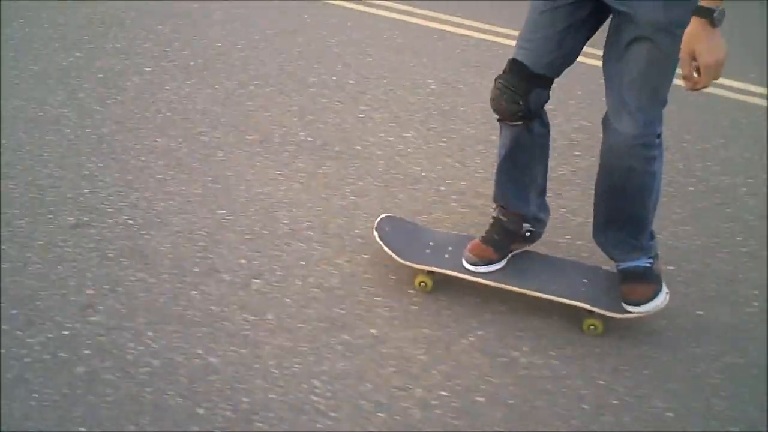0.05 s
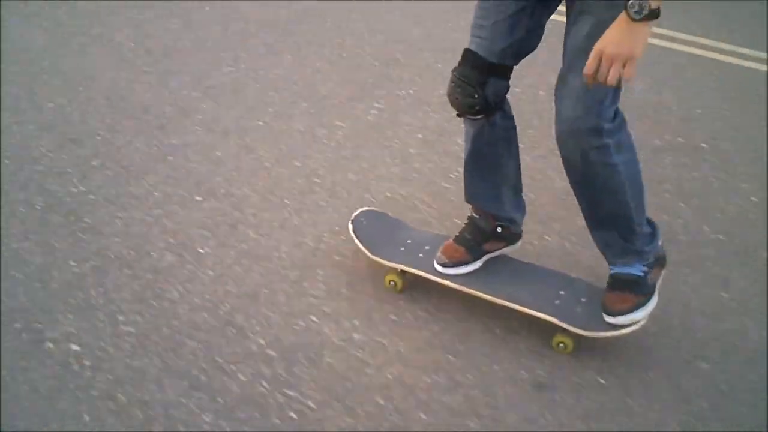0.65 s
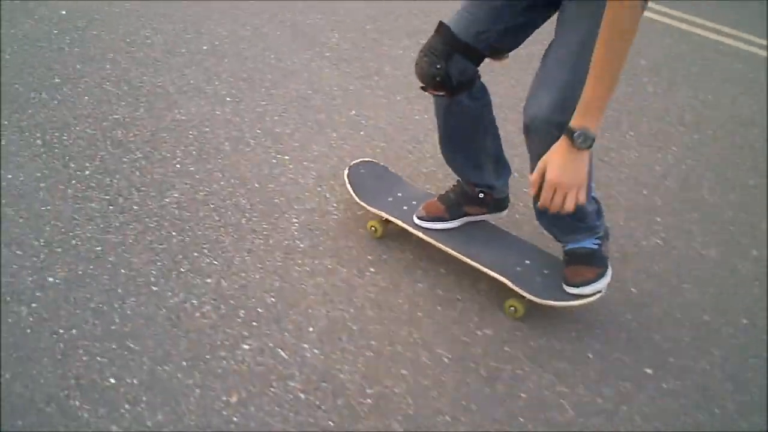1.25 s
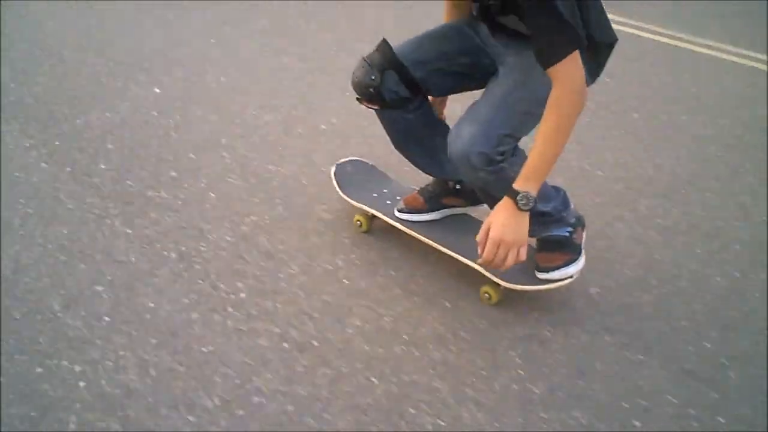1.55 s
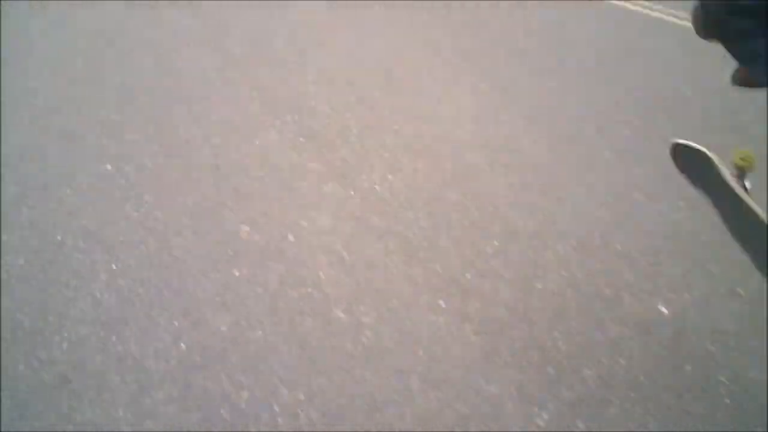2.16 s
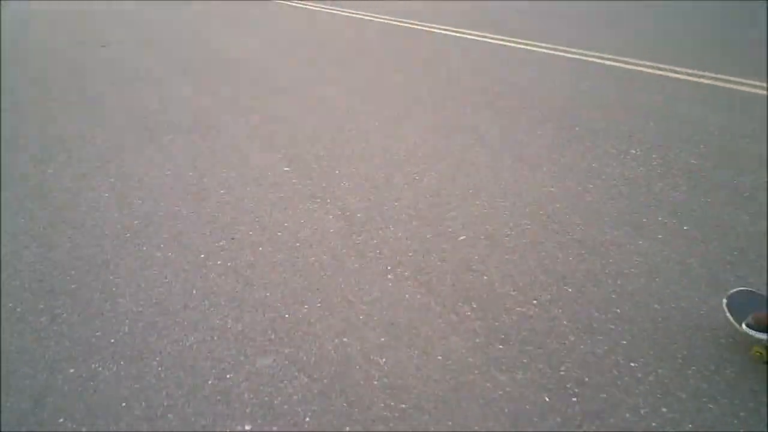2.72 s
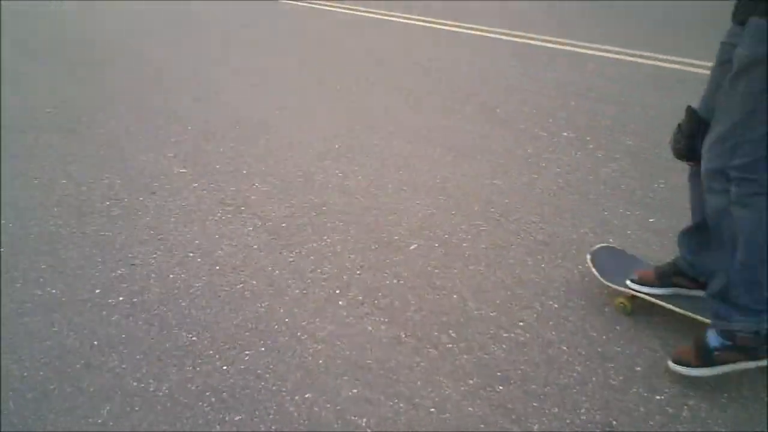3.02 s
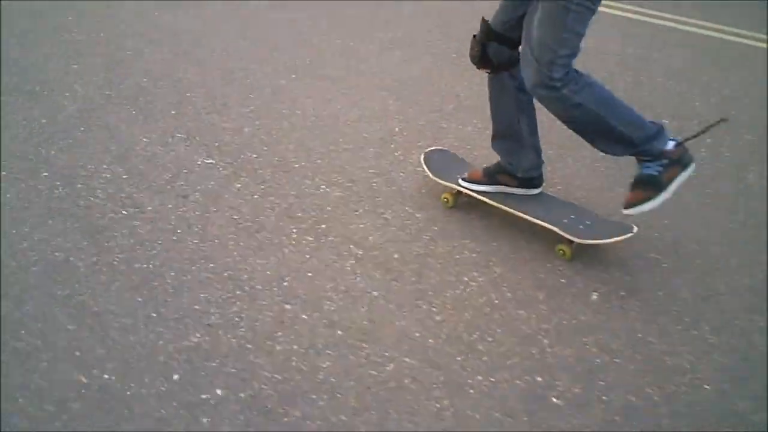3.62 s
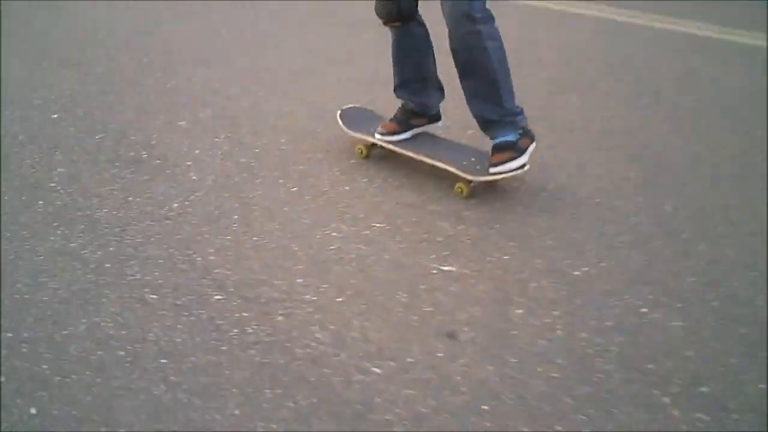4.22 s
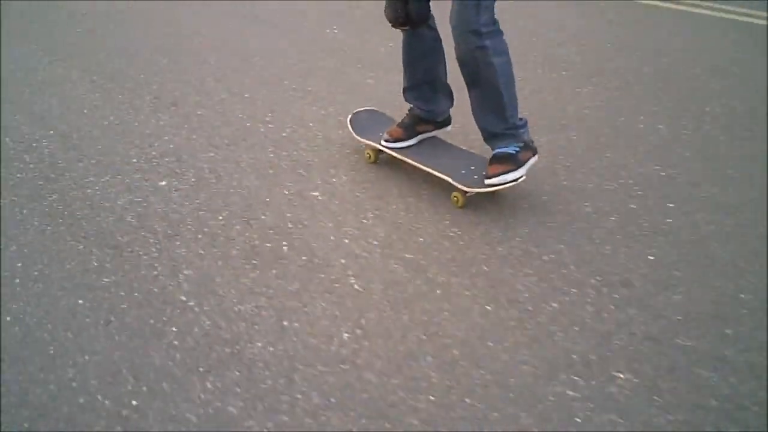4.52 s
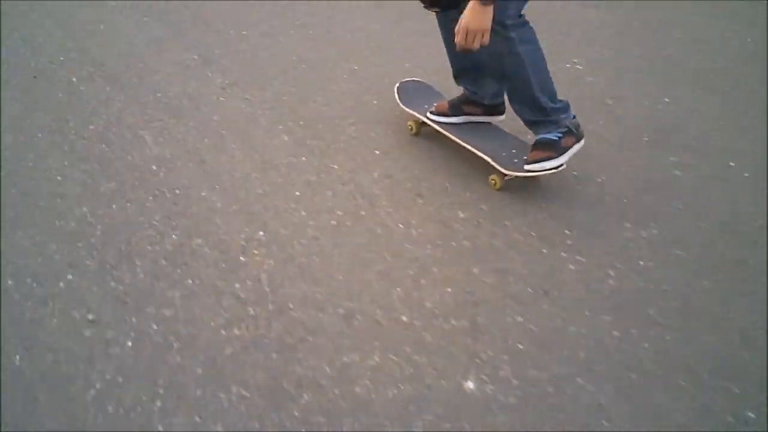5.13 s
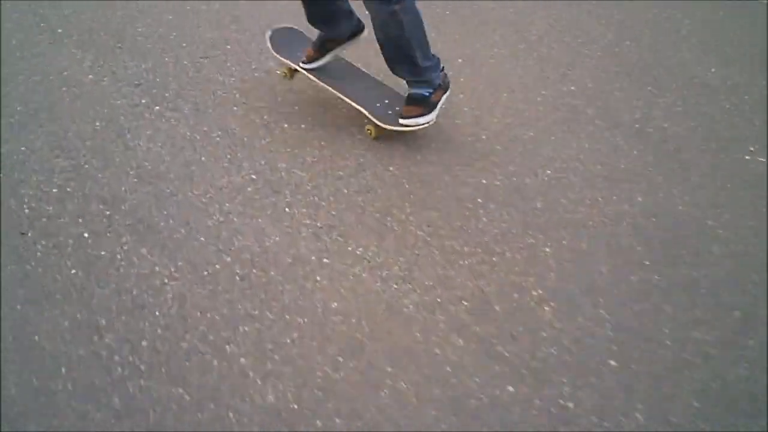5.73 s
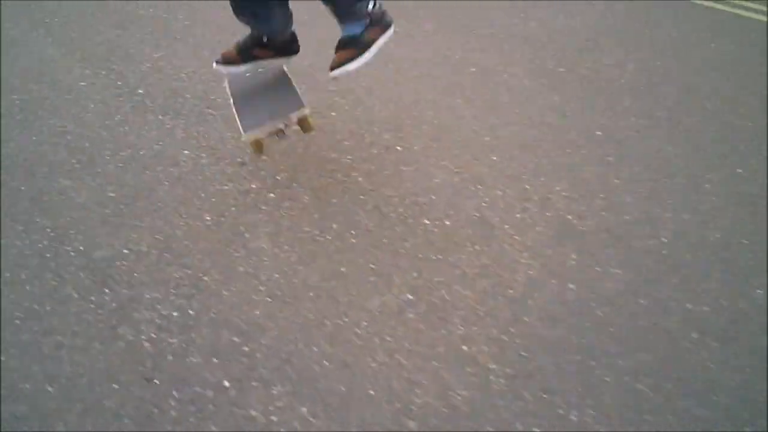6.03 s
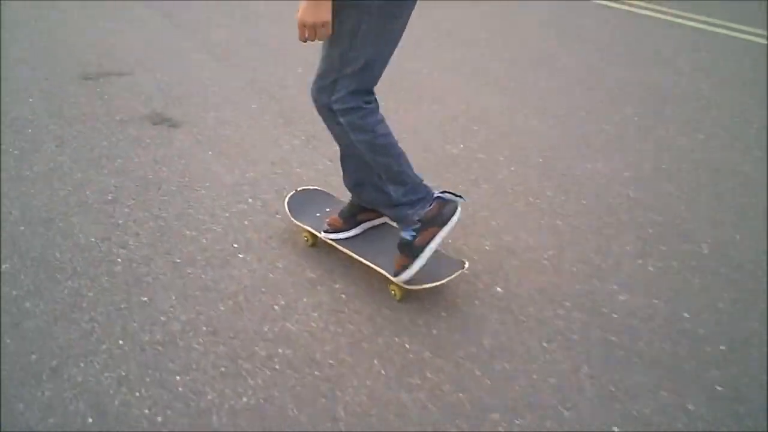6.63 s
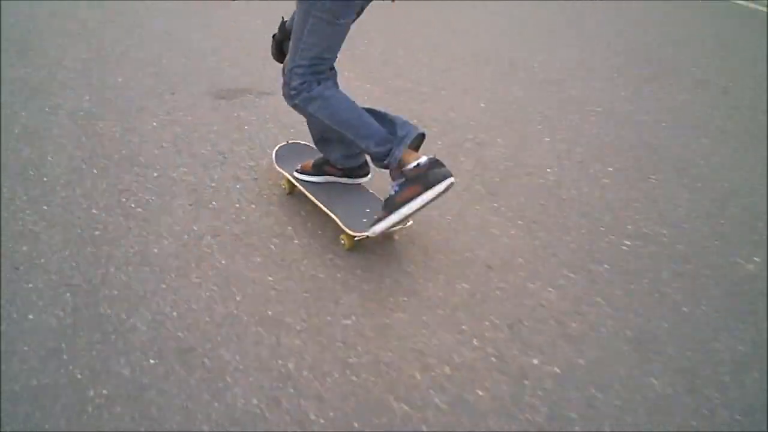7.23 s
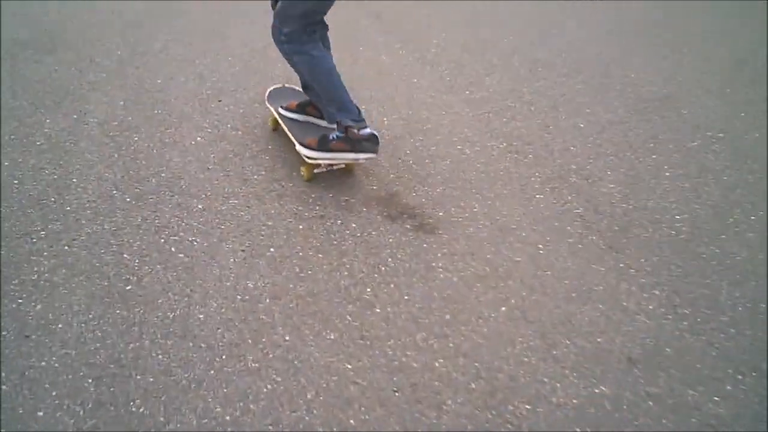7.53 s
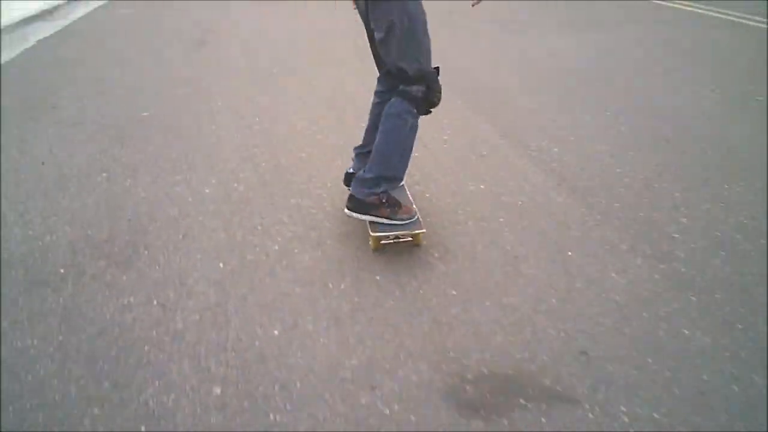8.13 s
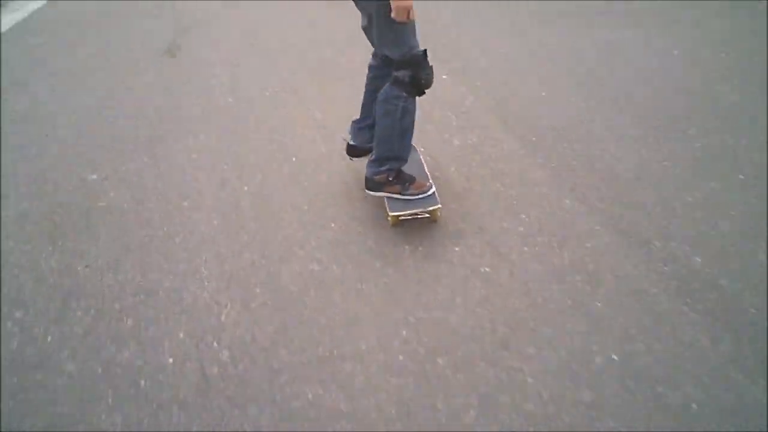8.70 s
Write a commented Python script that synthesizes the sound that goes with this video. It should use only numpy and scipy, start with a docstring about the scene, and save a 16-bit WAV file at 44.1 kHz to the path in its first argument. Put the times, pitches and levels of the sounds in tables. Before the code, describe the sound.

Outdoors on a road, the microphone travels on one skateboard following another, so a close, gritty rumble runs throughout. Wheels hiss and tick over grit, pebbles knock, and a loose bearing rings thinly in spurts. The skater does two tricks about four seconds apart: first a sharp pop and a rattling landing, then a barely heard takeoff and a loud clack with a thump. The rolling carries on, with almost no echo.

```python
"""A skateboard rumbles over asphalt close by, carrying the microphone behind a skater who pops two tricks.
Stones drum on the near deck, which resonates and chatters over coarse patches and pebbles.
The skater's hard wheels hiss, whirr and tick on grit and fall quiet in the air; a loose bearing pings.
Tail pops and landings are short rattling clacks: impacts that ring the modes of the deck
and drive the small recorder into its limiter."""
import sys
import numpy as np
from scipy import signal
from scipy.fft import rfft, irfft
from scipy.io import wavfile
from scipy.ndimage import uniform_filter1d, minimum_filter1d

SR = 44100
rng = np.random.default_rng(int(sys.argv[2]) if len(sys.argv) > 2 else 0)


def store_pcm(level_fs):
    """Save levels as 16-bit WAV."""
    pcm = np.round(np.clip(level_fs, -1, 1) * 32767).astype(np.int16)
    wavfile.write(sys.argv[1], SR, np.atleast_2d(pcm).T)


N = 386316
TIME = np.arange(N) / SR

# larger pebbles under the near wheels: start_s, relative_level_db, pitch_hz
PEBBLE_HITS = [(0.682, -16, 580), (0.742, -18.5, 690), (0.863, -12, 1100), (0.884, -15.5, 736),
               (1.484, -11.5, 608), (1.508, -10.5, 720), (1.536, -12.5, 603), (1.585, -15, 640),
               (2.189, -17, 820), (2.54, -19.5, 680), (2.603, -15, 547), (2.78, -19.5, 594),
               (2.815, -15, 460), (3.101, -17.5, 626), (3.425, -18, 604), (3.44, -23, 1137),
               (3.664, -13.5, 656), (4.139, -11, 770), (4.161, -10, 783), (4.175, -11, 690),
               (4.224, -8, 684), (5.001, -11, 710), (5.35, -17.5, 646), (5.541, -13.5, 585),
               (6.607, -30, 615), (7.21, -21, 880), (7.712, -10.5, 800), (8.538, -9, 840),
               (8.685, -13, 920), (8.703, -13, 640)]
# spectrum of grit under hard wheels: frequency_hz, gain_db
GRIT_SPECTRUM = [(900, -5.5), (1750, 10), (2120, 7.5), (2500, 5), (2950, -0.5), (3500, 3.5), (4600, 4),
                 (5800, 3), (7200, -1), (8600, -8), (10200, -16), (15500, -12.5)]


def near_board(drone_db=-44.5, drone_follow=0.2, coarse_drone_db=5.5, coarseness_per_db=0.02):
    """Roughness excitation: stones drum on the deck, in fewer and harder blows where the road is coarse."""
    # the road between patches: time_s, relative_level_db, coarseness (0 to 1)
    cruise = [(0.0, -23, 0.21), (0.55, -23, 0.07), (1.3, -24.5, 0.97), (2.1, -24.5, 0.75),
              (2.7, -24.5, 0.35), (3.4, -26, 0.1), (4.3, -25.5, 1), (5.4, -22.5, 0.68), (6.3, -26.5, 0.41),
              (7.0, -23, 0.59), (8.1, -23.5, 1.0), (8.76, -24, 0.47)]
    # rumble on smooth asphalt: frequency_hz, gain_db
    smooth_spectrum = [(100, -47.5), (200, -11), (290, -14), (400, -6.5), (500, 1), (690, 2), (770, -10),
                       (880, -10), (980, -36), (1130, -14.5), (1350, -10.5), (1800, -40.5), (3200, -42)]
    # rumble on coarse asphalt: frequency_hz, gain_db
    coarse_spectrum = [(100, -46), (200, -16.5), (290, -1), (385, -2), (490, 4.5), (560, -1), (700, 2.5),
                       (790, 1), (875, 5.5), (990, -7.5), (1090, -1), (1230, -7), (1360, -15.5),
                       (1540, -14.5), (2200, -31.5), (4000, -53.5)]
    # low drone of the loaded deck: frequency_hz, gain_db
    drone_spectrum = [(30, -15), (60, -31.5), (100, -17.5), (150, -7), (205, -2.5), (260, -6), (400, -10.5)]
    cruise_db, coarseness = in_time(cruise)
    swell_db = patches_db()
    level_db = cruise_db + swell_db
    coarseness = np.clip(coarseness + coarseness_per_db * swell_db, 0, 1)
    smooth_road = unit_rms(colour(grains(per_s=5000, spread_db=2.0), smooth_spectrum))
    coarse_road = unit_rms(colour(grains(per_s=2200, spread_db=2.0), coarse_spectrum))
    rumble = np.sqrt(1 - coarseness) * smooth_road + np.sqrt(coarseness) * coarse_road
    drone = unit_rms(colour(rng.standard_normal(N), drone_spectrum))
    flutter_db = 2.17 * np.tanh(drift(130)) - 1.35
    drone_swell_db = drone_follow * (level_db - level_db.mean())
    drone_swell_db += coarse_drone_db * (coarseness - coarseness.mean())
    return from_db(level_db + flutter_db) * rumble + from_db(drone_db + drone_swell_db) * drone


def patches_db():
    """Rolling noise follows roughness: the level ramps up or down into each patch, then returns."""
    # rough (+) and smooth (-) patches under the near board: centre_s, change_db, run_in_s, run_out_s
    patches = [(0.71, 8, 0.086, 0.083), (0.98, -6.5, 0.46, 0.41), (1.521, 4, 0.24, 0.14),
               (1.718, -3, 0.098, 0.46), (2.23, 6.5, 0.24, 0.22), (2.89, -4.5, 0.032, 0.042),
               (3.499, 7.5, 0.093, 0.096), (3.72, -7, 0.3, 0.21), (4.16, 7, 0.31, 0.17),
               (4.901, 9.5, 0.22, 0.13), (7.079, 6.5, 0.13, 0.057), (7.33, -8, 0.64, 0.22),
               (7.77, 8.5, 0.18, 0.16), (8.53, 9, 0.42, 0.15)]
    return sum(np.interp(TIME, [s - run_in, s, s + run_out], [0, db, 0])
               for s, db, run_in, run_out in patches)


def clacks(thud_decay_s=0.0045, crack_decay_s=0.0042, focus_db_per_octave=16.5):
    """Impact excitation: the board rattles on the road for milliseconds, then its modes decay freely."""
    # tail pops and landings: start_s, rattle_s, thud_db, crack_db, ring_db, focus_hz
    impacts = [(2.002, 0.0014, -14, -10.5, -12, 1450), (2.357, 0.0087, -16, -13, -16.5, 6160),
               (2.3957, 0.00089, -10, -13, -34, 4000), (2.408, 0.011, -2, -16, -4.5, 880),
               (5.8349, 0.012, -35, -23.5, -29, 3970), (6.1327, 0.0082, -11, -13.5, -13.5, 1460),
               (6.155, 0.015, -8, -12.5, -8.5, 1930)]
    # modes of deck and trucks: pitch_hz, level_db, t60_s
    deck_modes = [(565, 7, 0.062), (882, 11.5, 0.061), (920, 8, 0.047), (1127, -3, 0.04), (1530, 21, 0.014),
                  (1640, 12, 0.018), (1765, 15.5, 0.027), (1880, 5, 0.038), (2010, 14, 0.023),
                  (2120, 4, 0.025), (2173, 9, 0.044), (2530, -11, 0.04), (2670, -13, .04),
                  (3860, 1.5, 0.01), (4700, -7, 0.024), (5550, -13, 0.023), (7150, -4, 0.013)]
    # thud of the deck: frequency_hz, gain_db
    thud_spectrum = [(70, -50), (150, -21), (270, -12.5), (380, -7.5), (500, -1), (850, 0.5), (1150, -4.5),
                     (1600, -40.5), (3000, -62)]
    # crack of the hard contact: frequency_hz, gain_db
    crack_spectrum = [(150, -44), (600, -17), (1300, 5), (2100, 0.5), (2900, -0.5), (3700, 2), (5200, -0.5),
                      (7300, -4.5), (9000, -15), (11000, -33), (15500, -16)]
    out, t = np.zeros(N), TIME[:SR // 5]
    for s, rattle_s, thud_db, crack_db, ring_db, focus_hz in impacts:
        deck_response = np.zeros(len(t))
        for hz, db, t60 in deck_modes:
            # the spot that is struck favours the modes near focus_hz
            mode_db = db - focus_db_per_octave * abs(np.log2(hz / focus_hz))
            deck_response += from_db(mode_db - 60 * t / t60) * np.sin(2 * np.pi * hz * t)
        contacts = rng.standard_normal((3, len(t)))
        after_s = np.maximum(t - rattle_s, 0)
        crack_envelope = np.exp(-after_s / crack_decay_s)
        thud = colour(contacts[0] * np.exp(-after_s / thud_decay_s), thud_spectrum)
        crack = colour(contacts[1] * crack_envelope, crack_spectrum)
        ring = np.gradient(signal.fftconvolve(contacts[2] * crack_envelope, deck_response)[:len(t)])
        energy = (rattle_s + 0.0011) * SR  # a longer rattle delivers more energy
        for part, db in (thud, thud_db), (crack, crack_db), (ring, ring_db):
            add(out, s, from_db(db) * part * np.sqrt(energy / np.sum(part ** 2)))
    return out


def thumps(width_hz=75, damping_hz=220):
    """Damped bending: the deck flexes under each landing in a low, short thump."""
    # the rider's weight comes down: start_s, peak_db, pitch_hz
    landings = [(2.359, -11.5, 280), (6.156, -10.5, 431)]
    out, push = np.zeros(N), signal.unit_impulse(SR // 10)
    for s, db, hz in landings:
        thump = resonate(resonate(push, hz, width_hz), hz, damping_hz)
        add(out, s, from_db(db) * unit_peak(thump))
    return out


def pebbles(width_hz=230, damping_hz=380, contact_hz=1500, gain_db=5.0):
    """Compliant contact: a soft wheel low-passes a stone's blow into a hollow knock of a few cycles."""
    out = np.zeros(N)
    push = butterworth(signal.unit_impulse(SR // 20), 2, contact_hz)
    for s, db, hz in PEBBLE_HITS:
        knock = resonate(resonate(push, hz, width_hz), hz, damping_hz)
        add(out, s, from_db(db + gain_db) * unit_peak(knock))
    return out


def truck_rattle(chatter_db=-42.5, follow=1.52, jolt_db=-10.0, jolt_decay_s=0.0074):
    """Forced vibration: the near board's trucks chatter on rough patches and are jolted by each pebble."""
    # response of trucks and hardware: frequency_hz, gain_db
    truck_spectrum = [(400, -30), (800, 4.5), (980, -2), (1250, 2.5), (1550, -3.5), (2000, -12.5),
                      (2900, -33), (6000, -29)]
    chatter = from_db(chatter_db + follow * patches_db()) * grains(per_s=270, spread_db=12.5)
    jolts, t = np.zeros(N), TIME[:SR // 20]
    for s, db, _ in PEBBLE_HITS:
        add(jolts, s, from_db(db + jolt_db) * np.exp(-t / jolt_decay_s))
    force = chatter + jolts * rng.standard_normal(N)
    response = colour(signal.unit_impulse(len(t)), truck_spectrum)
    return signal.fftconvolve(force, response / np.linalg.norm(response))[:N]


def skater_wheels(hiss_gain_db=1.5, metal_db=-4.5, whirr_air_factor=2.5):
    """Rolling contact: hard wheels crackle on grit, ring and whirr; in the air the whirr drops furthest."""
    # hiss while on the road: time_s, relative_level_db
    hiss_levels = [(0.0, -39.5), (0.7, -42), (1.85, -39), (2.5, -44), (2.95, -47), (3.35, -43.5),
                   (4.95, -43), (5.3, -47), (5.7, -40.5), (6.15, -43.5), (6.6, -47), (7.35, -39.5),
                   (7.92, -42), (8.04, -48.5), (8.27, -39), (8.76, -44.5)]
    # whirr, building up on each run: time_s, level_db
    whirr_levels = [(0.0, -59), (1.4, -73), (1.8, -42), (2.6, -51), (3.3, -46), (3.7, -50), (4.0, -43.5),
                    (4.8, -39.5), (5.65, -37), (6.3, -46), (6.9, -59), (7.45, -41.5), (8.05, -61),
                    (8.76, -48)]
    # modes of wheels and bearings: pitch_hz, width_hz, level_db
    metal_modes = [(1587, 110, 4), (2117, 75, 7.5), (2380, 62, -5.5), (3280, 52, -6), (3630, 140, 0.5),
                   (3990, 210, 4), (4570, 140, -6.5), (5000, 120, -2.5), (5410, 130, 0), (5920, 100, -6.5)]
    # modes of the whirr: pitch_hz, width_hz, level_db
    whirr_modes = [(2570, 140, -4), (3230, 160, -0.5), (3530, 290, 1.5), (3760, 250, -5)]
    hiss_db, = in_time(hiss_levels)
    whirr_db, = in_time(whirr_levels)
    air_db = airborne_db()
    flutter = unit_rms(from_db(2.2 * drift(60) + 5.2 * np.tanh(drift(350))))
    crackle = unit_rms(colour(grains(per_s=8000, spread_db=2.0), GRIT_SPECTRUM))
    hiss = from_db(hiss_gain_db) * flutter * crackle
    metal = from_db(metal_db) * ringing(metal_modes, knocks_per_s=700, spread_db=3.5, wander_db=4.0)
    whirr = ringing(whirr_modes, knocks_per_s=650, spread_db=2.5, wander_db=3.0)
    whirr = unit_rms(resonate(whirr, hz=3500, width_hz=1400))
    whirr *= from_db(whirr_db + whirr_air_factor * air_db)
    return from_db(lulls_db()) * (from_db(hiss_db + air_db) * (hiss + metal) + whirr)


def ringing(modes, knocks_per_s, spread_db, wander_db):
    """Modal superposition: random knocks ring a wheel's modes, each wandering in strength."""
    knocks = grains(knocks_per_s, spread_db) + 1e-18
    return unit_rms(sum(from_db(db + wander_db * drift(9.7)) * unit_rms(resonate(knocks, hz, width_hz))
                        for hz, width_hz, db in modes))


def airborne_db(landed_db=-3.5, lift_s=0.076, touch_s=0.03, settle_s=0.92):
    """Loss of contact: the skater's wheels fall quiet in the air and recover after the landing."""
    # tricks: takeoff_s, landing_s, change_db
    flights = [(1.87, 2.32, -6.5), (5.68, 6.128, -8.5)]
    return sum(np.interp(TIME, [up, up + lift_s, down, down + touch_s, down + settle_s],
                         [0, db, db, landed_db, 0]) for up, down, db in flights)


def lulls_db():
    """Amplitude modulation: the sound of the skater's wheels dips briefly."""
    # dips in level: centre_s, half_length_s, change_db
    lulls = [(2.568, 0.044, -10), (2.675, 0.02, -12), (2.893, 0.044, -12), (3.194, 0.016, -13),
             (3.233, 0.016, -17), (3.645, 0.032, -2)]
    return sum(np.interp(TIME, [s - half, s, s + half], [0, db, 0]) for s, half, db in lulls)


def bearing(knocks_per_s=133, jitter_cycles=0.11, ping_s=0.00029, spread_db=6.5, air_factor=2.5):
    """Quasi-periodic impacts: a loose bearing's balls ping at the wheel's pace and fade when unloaded."""
    gain, ping_hz = bearing_spurts()
    cycles = np.maximum.accumulate(knocks_per_s * TIME + jitter_cycles * drift(140))
    sizes = from_db(spread_db * rng.standard_normal(N).clip(-2, 1.5))
    knocks = np.diff(np.floor(cycles), prepend=0) * sizes
    phases = np.exp(2j * np.pi * rng.random(N))
    pole = np.exp(-1 / (ping_s * SR))  # a double pole: each ping swells and dies in about a millisecond
    envelopes = signal.lfilter([1], [1, -2 * pole, pole * pole], knocks * phases + 1e-18)
    carrier = np.exp(2j * np.pi * np.cumsum(ping_hz) / SR)
    pings = unit_rms(np.real(envelopes * carrier))
    return gain * from_db(air_factor * airborne_db(landed_db=0)) * pings


def bearing_spurts(attack_s=0.0039, release_s=0.014, fade_db_per_s=2.5, sag_hz_per_s=350):
    """Intermittent chatter: each spurt starts quickly, sags a little in gain and pitch, then dies."""
    # spurts of the loose bearing: start_s, length_s, level_db, start_pitch_hz
    spurts = [(0.0, 0.29, -43.5, 5480), (0.33, 0.22, -44, 4440), (1.069, 0.045, -37.5, 5680),
              (1.18, 0.96, -47, 5510), (2.632, 0.019, -44, 6020), (2.697, 0.075, -51, 6200),
              (2.81, 0.055, -46, 6100), (2.909, 0.12, -44, 6150), (3.036, 0.13, -47, 6020),
              (3.2, 0.014, -41, 5980), (3.249, 0.264, -41, 5730), (3.669, 0.11, -40.5, 6270),
              (3.774, 0.84, -48, 6340), (4.45, 0.78, -44.5, 5820), (5.55, 0.13, -52, 5800),
              (8.25, 0.16, -48, 7200)]
    gain, hz = np.zeros(N), np.zeros(N)
    for s, length_s, db, start_hz in spurts:
        t = np.maximum(TIME - s, 0)
        attack = np.minimum(t / attack_s, 1)
        release = np.exp(-np.maximum(t - length_s, 0) / release_s)
        spurt = from_db(db - fade_db_per_s * t) * attack * release
        hz = np.where(spurt > gain, start_hz - sag_hz_per_s * t, hz)  # the loudest spurt sets the pitch
        gain = np.maximum(gain, spurt)
    return gain, hz


def grit_ticks(decay_s=0.0068, gain_db=0.5):
    """Brittle fracture: a crushed grain of grit gives a brief burst of noise."""
    # grit cracking under wheels and shoes: start_s, relative_level_db
    ticks = [(0.1834, -20.5), (0.9377, -27), (2.023, -23), (2.338, -18.5), (2.528, -33.5), (2.816, -22.5),
             (3.2125, -27.5), (4.2826, -21), (4.4998, -22), (4.834, -36), (5.346, -24), (5.5346, -21.5),
             (5.7767, -26.5), (6.0704, -25.5), (6.6019, -25), (7.3956, -25), (7.4227, -16), (7.437, -19),
             (8.263, -21.5), (8.4207, -19.5)]
    out, t = np.zeros(N), TIME[:SR // 20]
    for s, db in ticks:
        tick = colour(rng.standard_normal(len(t)) * np.exp(-t / decay_s), GRIT_SPECTRUM)
        add(out, s, from_db(db + gain_db) * unit_peak(tick))
    return out


def grip_scuffs(hz=10500, width_hz=4500):
    """Sliding friction: a shoe scuffs across the grip tape in a thin, bright crackle."""
    # short scrapes: start_s, length_s, level_db
    scrapes = [(0.85, .045, -51), (0.925, 0.04, -43), (3.066, .015, -41), (4.834, 0.019, -45)]
    gain = sum(np.interp(TIME, [s, s + length_s / 2, s + length_s], [0, from_db(db), 0])
               for s, length_s, db in scrapes)
    contacts = grains(per_s=2800, spread_db=8.0)
    return gain * unit_rms(resonate(resonate(contacts, hz, width_hz), hz, width_hz))


def near_wheels(fizz_db=-53, follow=0.27):
    """Shot noise: fine grit fizzes under the near board's soft wheels, louder on rough patches."""
    # faint fizz of the soft wheels: frequency_hz, gain_db
    fizz_spectrum = [(600, 10.5), (2000, -1), (2900, -3), (3700, -13), (5500, -22), (8500, 3),
                     (10500, -4.5), (15500, -2)]
    fizz = unit_rms(colour(grains(per_s=3600, spread_db=6.5), fizz_spectrum))
    return from_db(fizz_db + follow * patches_db()) * fizz


def roadside(x, t60_s=0.076, delay_s=0.012, wet_db=-26):
    """Diffuse reflection: kerb and verge scatter back a faint, short tail."""
    t = TIME[:SR // 2]
    scatter = rng.standard_normal(len(t)) * from_db(-60 * t / t60_s) * (t > delay_s)
    scatter = butterworth(scatter, 1, hz=6000)
    return from_db(wet_db) * signal.fftconvolve(x, scatter / np.linalg.norm(scatter))[:N]


def microphone(x, dip_hz=2950, width_hz=300, dip_db=-2.0):
    """Antiresonance: the microphone's housing hollows out a narrow band."""
    return x - (1 - from_db(dip_db)) * resonate(x, dip_hz, width_hz)


def grains(per_s, spread_db):
    """Poisson process: random contacts of uneven size, at unit power."""
    sizes = from_db(spread_db * np.minimum(rng.exponential(1, N), 4)) * rng.choice([-1, 1], N)
    return unit_rms(sizes * (rng.random(N) < per_s / SR))


def drift(knots_per_s):
    """Random modulation: straight lines between Gaussian values, at unit power."""
    knots = rng.standard_normal(N // 40)
    return unit_rms(np.interp(TIME * knots_per_s, np.arange(len(knots)), knots))


def resonate(x, hz, width_hz):
    """Damped oscillator: a two-pole resonance of unit gain."""
    r = np.exp(-np.pi * width_hz / SR)
    feedback = [1, -2 * r * np.cos(2 * np.pi * hz / SR), r * r]
    return signal.lfilter(np.array([1, 0, -1]) * (1 - r * r) / 2, feedback, x)


def colour(x, spectrum, size=4096):
    """Minimum-phase filter with the given spectrum, falling away above its last point."""
    hz, db = np.transpose(spectrum)
    f = np.maximum(np.arange(size // 2 + 1) * SR / size, 1)
    gain = from_db(np.interp(np.log(f), np.log(hz), db)) / np.maximum(f / hz[-1], 1) ** 2
    cepstrum = irfft(np.log(gain))[:size // 2]
    cepstrum[1:] *= 2  # folding the cepstrum makes the response causal
    response = irfft(np.exp(rfft(cepstrum, size)))[:size // 2]
    return signal.fftconvolve(x, response)[:len(x)]


def butterworth(x, order, hz, kind="low"):
    """Maximally flat low-pass or high-pass filter."""
    return signal.sosfilt(signal.butter(order, hz, kind, fs=SR, output="sos"), x)


def from_db(db):
    """Decibels to amplitude ratio."""
    return 10 ** (np.asarray(db) / 20)


def unit_rms(x):
    """Normalise to unit power."""
    return x / np.sqrt(np.mean(x ** 2) + 1e-20)


def unit_peak(x):
    """Normalise to unit peak amplitude."""
    return x / np.abs(x).max()


def in_time(rows):
    """Linear interpolation of each column of a curve at every sample."""
    s, *columns = np.transpose(rows)
    return [np.interp(TIME, s, column) for column in columns]


def add(out, s, sound):
    """Superpose a sound from time s on."""
    i = int(s * SR)
    out[i:i + len(sound)] += sound[:N - i]


def scene():
    """Superposition: both boards roll on an open road, and their blows scatter from the roadside."""
    blows = clacks() + thumps() + pebbles() + truck_rattle() + grit_ticks() + grip_scuffs()
    rolling = near_board() + near_wheels() + skater_wheels() + bearing()
    return (rolling + blows + roadside(blows))[None]


def record(dry, low_cut_hz=85, high_cut_hz=11500, band_edge_hz=15800, release_db_per_s=700):
    """Peak limiting: the loudest clacks are ducked and any overshoot clipped; bass and top are cut."""
    heard = microphone(dry)
    over_db = np.maximum(20 * np.log10(np.abs(heard) + 1e-9), 0)  # excess above full scale
    release_db = release_db_per_s * TIME
    held_db = np.maximum.accumulate(over_db + release_db, axis=-1) - release_db
    gain_db = uniform_filter1d(minimum_filter1d(-held_db, size=24), size=24)
    clipped = np.clip(heard * from_db(gain_db), -0.97, 0.97)
    thinned = butterworth(clipped, 2, low_cut_hz, "high")
    dulled = butterworth(thinned, 2, high_cut_hz)
    return signal.sosfilt(signal.cheby1(12, 0.2, band_edge_hz, fs=SR, output="sos"), dulled)


dry = scene()
out = record(dry)
store_pcm(out)
```